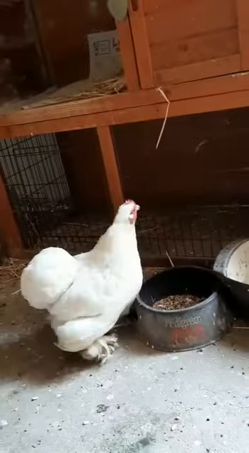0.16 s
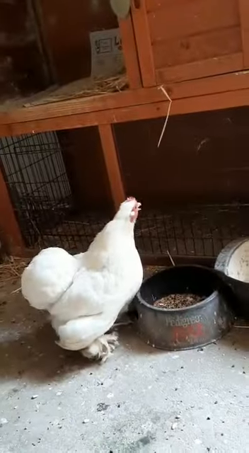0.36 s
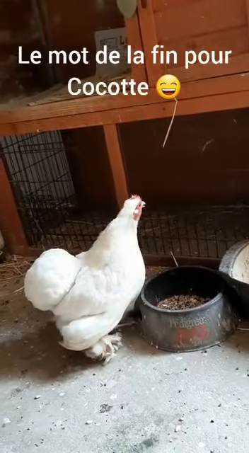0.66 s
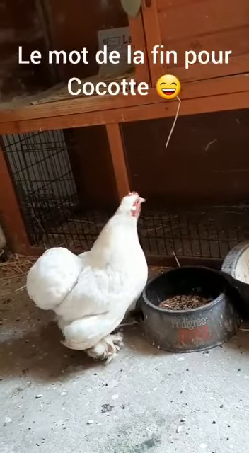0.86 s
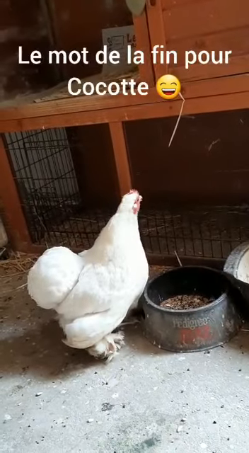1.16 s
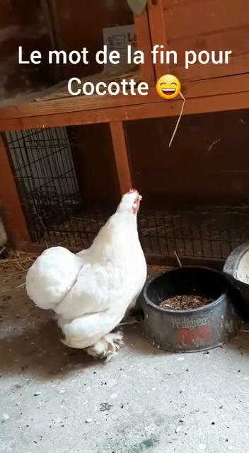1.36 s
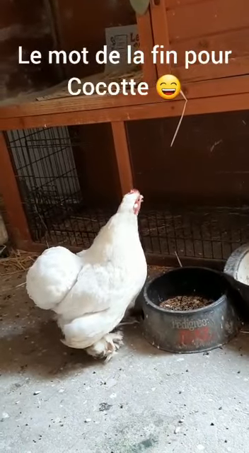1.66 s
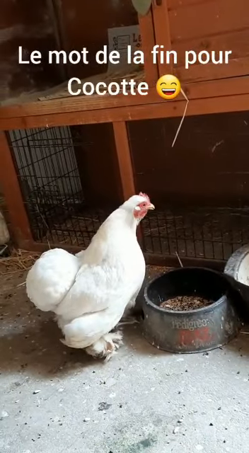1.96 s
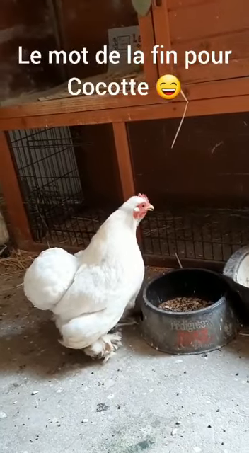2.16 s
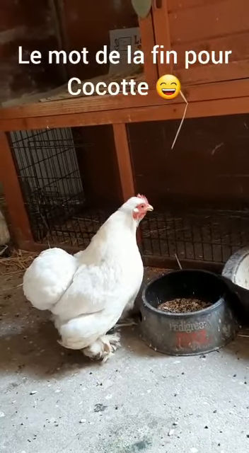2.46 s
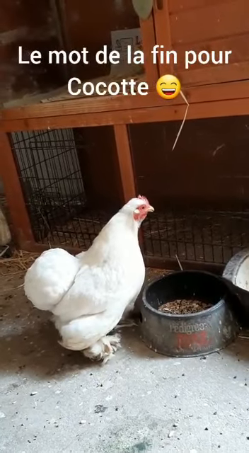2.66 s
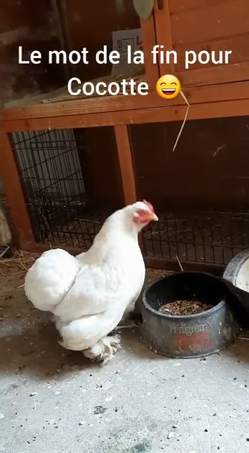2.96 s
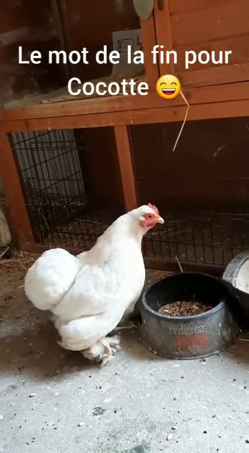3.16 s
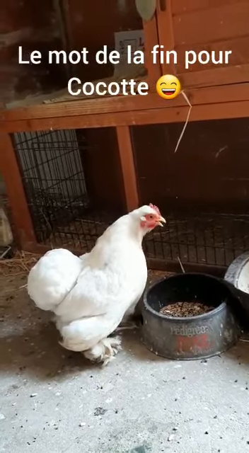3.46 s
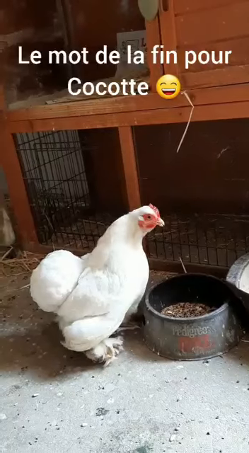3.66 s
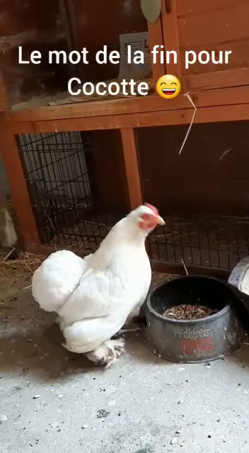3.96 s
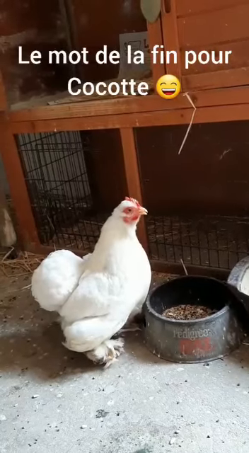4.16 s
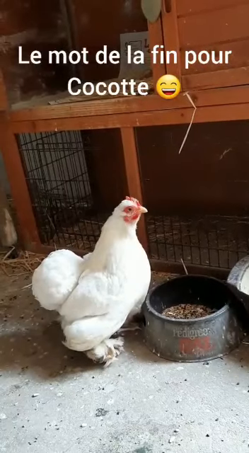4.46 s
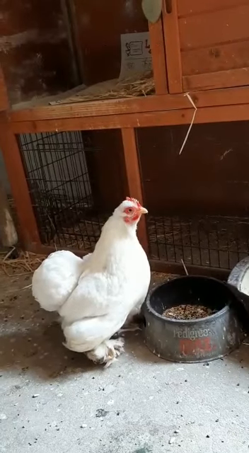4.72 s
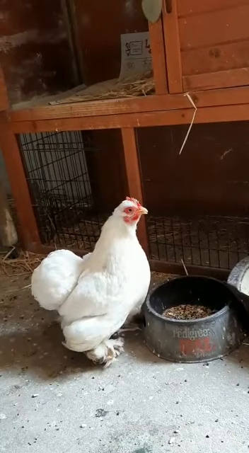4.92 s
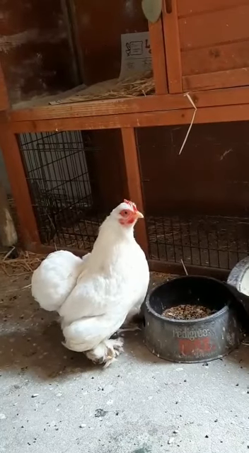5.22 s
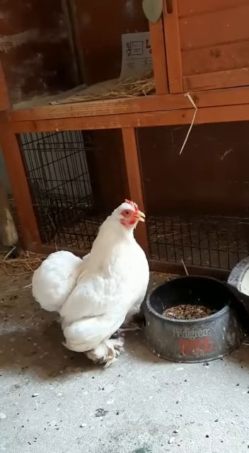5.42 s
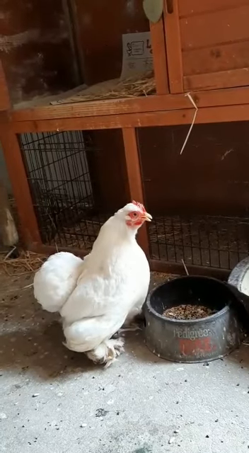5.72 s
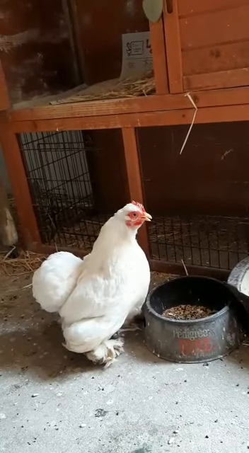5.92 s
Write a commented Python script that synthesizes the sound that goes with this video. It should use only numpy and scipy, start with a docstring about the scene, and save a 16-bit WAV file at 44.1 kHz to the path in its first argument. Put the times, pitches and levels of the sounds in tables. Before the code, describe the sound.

Close, echoing hen cackle: croaky little clucks spaced unevenly, four sudden piercing squawks, a few thin squeaks and one soft bump.

```python
"""In a hard-floored shed, beside a wooden coop, a hen cackles: short low clucks, and four times a cluck
that breaks upward into a loud, bright squawk. A few thin squeaks slip in, and there is one soft bump.
Clucks and squawks are pulse trains with turbulence, filtered by throat resonances; squeaks are sums
of a few sines; the bump is a decaying noise thud with a tick. The shed rings after each of them,
over a faint background of still air."""
import sys
import numpy as np
from scipy import signal
from scipy.fft import rfft, irfft, next_fast_len
from scipy.io import wavfile
from scipy.ndimage import uniform_filter1d, map_coordinates

SR = 44100
rng = np.random.default_rng(int(sys.argv[2]) if len(sys.argv) > 2 else 0)


def output_pcm(signal):
    """Save a mono or channel-first signal as 16-bit PCM at the path in sys.argv[1].

    Samples are clipped to [-1, 1] before scaling.
    """
    pcm = np.clip(np.atleast_2d(signal).T, -1, 1) * 32767
    wavfile.write(sys.argv[1], SR, np.round(pcm).astype(np.int16))


N = 268402

# All call levels hold at the source, before the shed.
# Squawks: (time [s], length [s], climb time [s], pitch on arrival [Hz], held pitch [Hz],
# pitch of the last push [Hz], clear-voice body level at the start [dB], the same at the end [dB],
# clear-voice treble level [dB])
SQUAWK_CALLS = [ (.312, 0.21, 0.063, 715, 703.3, 722, -26, -24.5, -28.5),
                (1.68, 0.24, .056, 692.1, 701.8, 730.7, -22.5, -25.5, -28.5),
                (3.411, .243, .058, 713.2, 696.7, 748, -21.5, -24.5, -27.5),
                (5.401, 0.23, .072, 752, 724, 743.2, -18, -25.5, -28), ]
# Clucks, the first just over as the scene opens: (time [s], length [s], climb time [s],
# top pitch before sag and wander [Hz], start level before the pressure deficit [dB], end level [dB],
# treble re body once the pressure is up [dB])
CLUCK_CALLS = [ (-.11, 0.078, .04, 426.4, -26, -44.5, -12.5),
               (0.236, 0.075, 0.033, 452.8, -36.5, -29.5, -11.5),
               (0.847, .059, .022, 476.5, -31.5, -32, -13), (1.205, 0.099, 0.088, 465.2, -36, -31, -12),
               (1.588, 0.084, 0.06, 449, -36, -29.5, -9.5), (2.262, 0.075, .018, 437.8, -30, -37, -12.5),
               (2.632, 0.098, 0.088, 428.2, -33, -34.5, -10), (2.931, 0.091, 0.026, 412.5, -31, -37, -13),
               (3.338, 0.068, 0.041, 453.8, -33.5, -27, -10.5), (4, 0.056, 0.038, 449.7, -35, -32.5, -10.5),
               (4.349, 0.062, 0.0208, 278.1, -30.5, -40, -10),
               (4.674, .052, 0.0174, 298.6, -32, -34, -11.5),
               (5.082, 0.058, 0.017, 305.9, -28.5, -33.5, -10.5), (5.337, .065, 0.048, 435.3, -27, -28, -7),
               (5.949, 0.08, .044, 452, -29, -33, -8), ]
# Squeaks: (time [s], length [s], start pitch [Hz], end pitch [Hz], mid-call level [dB], roughness [0-1])
SQUEAK_CALLS = [ (2.203, .05, 1690, 1530, -56.5, 0.15), (2.561, .062, 1577, 1590, -50, 0.06),
                (5.743, 0.11, 1714, 1861, -41.5, 0.27), ]
# Throat resonances, beak wide open: (centre [Hz], width [Hz], level [dB])
OPEN_THROAT = [(596, 210, -15.5), (1153, 275, 11.5), (1491, 250, 2.5), (2104, 300, 3), (2825, 75, -22),
               (3568, 400, -1.5), (4262, 300, -7.5), (5120, 350, -14.5), (5730, 500, -3), (7180, 2100, -16),
               (9680, 680, -16), (12400, 4600, -21), (12300, 4600, -12.5)]
# Throat resonances, beak nearly shut: (centre [Hz], width [Hz], level [dB])
SHUT_THROAT = [(306, 120, -7.5), (464, 150, -19.5), (846, 230, -6.5), (1055, 163, 3), (1500, 153, -1.5),
               (1840, 340, -16), (3617, 920, -13.5), (4934, 510, -17.5), (5720, 2100, -25), (7700, 94, -27),
               (9500, 240, -27.5), (11400, 730, -20), (13700, 2300, -23), (15400, 3800, -36)]
# Throat resonances of the lowest, most closed notes: (centre [Hz], width [Hz], level [dB])
LOW_THROAT = [(312, 130, -2.5), (831, 130, -13), (1092, 348, 9), (1515, 190, 4), (3430, 450, -15),
              (4844, 270, -12), (5870, 860, -27), (7930, 200, -23), (11000, 780, -29.5), (11400, 1100, -32),
              (13100, 3600, -30.5), (15100, 1600, -19.5)]
# Antiresonances of the windpipe: (centre [Hz], width [Hz], depth [dB])
WINDPIPE_NOTCHES = [(2585, 228, -8), (6230, 180, -14), (7430, 320, -2.5)]
# Bumps, before the shed: (time [s], level [dB])
BUMPS = [(4.327, -40)]
# Spectrum of the thud: (frequency [Hz], relative level [dB])
THUD_COLOUR = [(25, -19.5), (90, -8), (190, 2.0), (400, -12.5), (850, -2.5), (2000, -24), (8000, -30)]
# Reverberation time of the shed: (frequency [Hz], t60 [s])
SHED_T60 = [(100, 0.56), (290, 0.41), (530, 0.52), (1400, 0.45), (3700, 0.43), (9700, 0.28), (16000, 0.25)]
# Spectrum of the ringing as it starts: (frequency [Hz], relative level [dB])
TAIL_COLOUR = [(100, 14), (300, -3), (600, 3), (1000, -2), (2200, 2.5), (4000, 1), (8000, 5), (16000, -4.5)]
# Spectral density of the still air: (frequency [Hz], relative level per Hz [dB])
AIR_COLOUR = [(25, -4.5), (90, -10.5), (300, -8), (1000, -6.5), (2500, -17), (5000, -20), (15000, -22)]
# Sensitivity of the left port over the right: (frequency [Hz], level difference [dB])
PORT_DIFFERENCE = [(200, 0), (900, -0.1), (2500, 1), (6000, -1), (7800, 3), (9000, -9), (11000, -7),
                   (15000, -7)]

LEAD = SR // 4  # samples of sound before time zero
TOP_HZ, EDGE_HZ = 15900, 300  # band limit and the width of its slope
PORT_SPACING = 0.00051  # s of sound travel between the two ports
SWELL = .02  # s over which a call builds before its start

SQUAWK_START_HZ, SQUAWK_END_HZ = 553.8, 501.8  # where the voice enters and leaves the high register
HOLD_SHARE = .67  # part of a squawk that passes before the last push
COLLAPSE_S = 0.025  # the pitch falls away at the very end
CLEAN_HZ, BREAK_HZ = 680, 130  # clear from this pitch up, fully hoarse this far below it
HOARSE_BODY_DB, HOARSE_TREBLE_DB = 2, -6.5  # a hoarse voice is fuller and duller than a clear one

CLUCK_START_HZ = 271.8  # low croak at the start of each climb, before wander
CLUCK_SAG_HZ_PER_S = 500  # the pitch sinks once the climb is over
CLUCK_WANDER = .035  # scale of the random pitch wander, relative to the pitch
CLUCK_RISE_DB, CLUCK_RISE_S = 4, 0.02  # the pressure builds by this much at the start of a cluck
CLUCK_DULL_START_DB = 1.5  # the treble lags behind the body while the pressure builds
SQUEAK_EDGE_DB = -2.5  # a squeak is softer at both ends than in its middle


def squawk(length, climb_s, arrival_hz, held_hz, push_hz, start_db, end_db, top_db):
    """Register break: a clear scream, hoarse where the pitch enters and leaves the high register."""
    t, gate = airflow(length, attack=.004, release=.006)
    pitch_hz = squawk_pitch(t, length, climb_s, arrival_hz, held_hz, push_hz)
    hoarse = np.clip((CLEAN_HZ - pitch_hz) / BREAK_HZ, 0, 1)
    db = np.interp(t, [0, length], [start_db, end_db]) + HOARSE_BODY_DB * hoarse
    treble_db = top_db + HOARSE_TREBLE_DB * hoarse - db  # re body
    pulses, puffs = syrinx(t, pitch_hz, jitter=.003 + .03 * hoarse, jitter_rate=220)

    # a slower second vibration puts side bands between the harmonics
    second_hz = 290 * (1 + 0.056 * wobble(t, 90))
    second = np.sin(2 * np.pi * np.cumsum(second_hz) / SR)
    pulses = pulses * (1 + (.03 + .5 * hoarse) * second)

    body_rough = .03 + .6 * hoarse
    treble_rough = .06 + .75 * hoarse
    wide = voiced(pulses, puffs, OPEN_THROAT, 4650, treble_db, body_rough, treble_rough)
    narrow = voiced(pulses, puffs, SHUT_THROAT, 4350, treble_db, body_rough, treble_rough)
    shut = 0.32 * hoarse ** 2  # the beak opens as the pitch climbs
    return gate * amp(db) * ((1 - shut) * wide + shut * narrow)


def squawk_pitch(t, length, climb_s, arrival_hz, held_hz, push_hz):
    """Pitch follows tension: it climbs, settles, lifts with a last push and collapses."""
    top_hz = np.interp(t, [climb_s, HOLD_SHARE * length, length - COLLAPSE_S, length],
                       [arrival_hz, held_hz, push_hz, SQUAWK_END_HZ])
    return SQUAWK_START_HZ + (top_hz - SQUAWK_START_HZ) * climb(t, climb_s)


def cluck(length, climb_s, top_hz, start_db, end_db, treble_db):
    """Irregular vibration: a croaky note climbs and sags while the throat opens a little with pitch."""
    t, gate = airflow(length, attack=.0015, release=.006)
    pitch_hz = CLUCK_START_HZ + (top_hz - CLUCK_START_HZ) * climb(t, climb_s)
    pitch_hz = pitch_hz - CLUCK_SAG_HZ_PER_S * np.maximum(np.minimum(t, length) - climb_s, 0)
    pitch_hz = pitch_hz * (1 + CLUCK_WANDER * wobble(t, 110.2))

    slack = 1 - climb(t, CLUCK_RISE_S)  # pressure still missing, 1 to 0
    db = np.interp(t, [0, length], [start_db, end_db]) - CLUCK_RISE_DB * slack
    treble_db = treble_db - CLUCK_DULL_START_DB * slack

    pulses, puffs = syrinx(t, pitch_hz, jitter=.022, jitter_rate=300)
    shimmer_db = 1.8 * wobble(t, 250)  # the strength of the pulses varies at random
    pulses = pulses * amp(shimmer_db)
    low = voiced(pulses, puffs, LOW_THROAT, 4030, treble_db, body_rough=.3, treble_rough=.6)
    high = voiced(pulses, puffs, SHUT_THROAT, 4350, treble_db, body_rough=.45, treble_rough=.8)
    opening = np.clip((pitch_hz - 315) / 70, 0, 1)
    return gate * amp(db) * ((1 - opening) * low + opening * high)


def squeak(length, start_hz, end_hz, middle_db, rough):
    """Few harmonics sound thin: a wavering whistle glides, swells and fades."""
    t, gate = airflow(length, attack=.004, release=.009)
    pitch_hz = np.interp(t, [0, length], [start_hz, end_hz])
    pitch_hz = pitch_hz * (1 + (0.023 + 0.062 * rough) * wobble(t, 700))
    db = middle_db + SQUEAK_EDGE_DB * np.interp(t, [0, length / 2, length], [1, 0, 1])
    phase = 2 * np.pi * np.cumsum(pitch_hz) / SR
    harmonics_db = (0, -4, -14, -26)  # relative to the fundamental
    whistle = sum(amp(level) * np.sin(k * phase) for k, level in enumerate(harmonics_db, 1))
    return gate * amp(db) * unit(whistle)


def syrinx(t, pitch_hz, jitter, jitter_rate, smear=0.046):
    """Membrane oscillation: one slightly spread pulse a cycle, each with a puff of turbulence."""
    phase = 2 * np.pi * np.cumsum(pitch_hz * (1 + jitter * wobble(t, jitter_rate))) / SR
    k = np.arange(1, int(TOP_HZ / pitch_hz.min()) + 2)[:, None]  # harmonic numbers
    below_nyquist = k * pitch_hz < SR / 2
    pulses = np.sum(np.cos(k * phase - smear * k ** 2) * below_nyquist, axis=0)
    puffs = rng.standard_normal(SR)[:len(t)] * (1 + np.cos(phase))
    return unit(pulses), unit(puffs)


def voiced(pulses, puffs, modes, notch_hz, treble_db, body_rough, treble_rough):
    """Source and filter: the throat shapes body and noisier treble; treble_db sets treble re body."""
    low = lambda hz: 1 / (1 + (hz / 2600) ** 16)
    body = filtered(pulses + body_rough * puffs, lambda hz: throat(modes, notch_hz, hz) * low(hz))
    treble = filtered(pulses + treble_rough * puffs,
                      lambda hz: throat(modes, notch_hz, hz) * (1 - low(hz)))
    return steady(body) + amp(treble_db) * steady(treble)


def throat(modes, notch_hz, hz, floor_db=-40):
    """Resonance and antiresonance: a causal response whose notch at notch_hz goes with the beak."""
    gain = sum(amp(db) / (1 + (2 * (hz - centre) / width) ** 2) for centre, width, db in modes)
    notches = list(WINDPIPE_NOTCHES) + [(notch_hz, 200, -15)]
    notch_db = sum(db * np.exp(-((hz - centre) / width) ** 2) for centre, width, db in notches)
    gain = gain * amp(notch_db)
    # a low floor around 100 Hz keeps the response from falling to nothing just below the voice
    floor = amp(floor_db) * (hz / 100) ** 2 / (1 + (hz / 100) ** 4)
    gain = gain * hz ** 4 / (hz ** 4 + 210 ** 4) + floor
    # folding the cepstrum forward in time gives the minimum-phase response
    cepstrum = irfft(np.log(gain + 1e-5))
    cepstrum[len(cepstrum) // 2:] = 0
    cepstrum[1:] *= 2
    return np.exp(rfft(cepstrum))


def airflow(length, attack, release):
    """Self-excitation: vibration grows exponentially, saturates, and dies when the air stops."""
    t = np.arange(int(length * SR) + SR // 16) / SR - SWELL  # s from the start of the call
    onset = 1 / (1 + np.exp(1 - t / attack))
    decay = np.exp(-np.maximum(t - length, 0) / release)
    return t, onset * decay


def climb(t, duration):
    """Membrane tension: a smooth step from 0 to 1 as the membranes tighten."""
    return np.sin(np.pi / 2 * np.clip(t / duration, 0, 1)) ** 2


def bump(thud_db=-6, tick_db=-11, t60=0.16):
    """Damped impact: a decaying low noise thud with a brief tick at its start."""
    t = np.arange(SR // 2) / SR
    thud = unit(filtered(rng.standard_normal(len(t)), lambda hz: amp(along(THUD_COLOUR, hz))))
    tick = amp(-60 * t / .008) * rng.standard_normal(len(t))
    return amp(thud_db - 60 * t / t60) * thud + amp(tick_db) * tick


def shed(x, direct_db=-6.5, early_db=-4, early_t60=0.051, tail_db=-4, build=0.0062):
    """Reverberation at two ports: direct sound, floor and coop reflections, then the shed's ringing."""
    hz, frame_s, noise = signal.stft(rng.standard_normal((2, SR)), SR, nperseg=256)
    decay_db = along(TAIL_COLOUR, hz)[:, None] - 60 * frame_s / along(SHED_T60, hz)[:, None]
    tail = signal.istft(noise * amp(decay_db), SR, nperseg=256)[1][:, :SR]
    t = np.arange(SR) / SR
    tail = tail * (1 - np.exp(-t / build))

    sparse = (rng.random(SR) < .02) * (t > .001)
    early = rng.standard_normal((2, SR)) * sparse * amp(-60 * t / early_t60)
    echoes = (amp(early_db) * unit(early) + amp(tail_db) * unit(tail)) / np.sqrt(SR)

    def mid_side(hz):
        # long waves reach both ports alike, short ones differ
        coherence = np.clip(0.84 * np.sinc(2 * hz * PORT_SPACING), -1, 1)
        return np.sqrt((1 + np.outer([1, -1], coherence)) / 2)

    mid, side = filtered(echoes, mid_side)
    answer = np.array([mid + side, mid - side])
    answer[:, 0] += amp(direct_db)
    return signal.fftconvolve(x[None], answer, axes=1)


def air(level_db=-80):
    """Partly coherent noise: faint still air, mostly alike at both ports."""
    noise = rng.standard_normal(N) + 0.24 * rng.standard_normal((2, N))
    return amp(level_db) * unit(filtered(noise, lambda hz: amp(along(AIR_COLOUR, hz))))


def amp(db):
    """Logarithmic level: decibels to amplitude gain."""
    return 10 ** (np.asarray(db) / 20)


def unit(x):
    """Normalisation: scale to rms 1."""
    return x / np.sqrt(np.mean(x ** 2) + 1e-20)


def steady(x):
    """Level equalisation: hold the short-time rms near 1."""
    power = np.abs(uniform_filter1d(x ** 2, size=600))
    return x / np.sqrt(power + 1e-3 * np.mean(x ** 2))


def along(points, hz):
    """Interpolation: (frequency [Hz], value) points read on a log frequency axis."""
    f, v = np.transpose(points)
    return np.interp(np.log(hz + 1), np.log(f), v)


def wobble(t, rate):
    """Slow random modulation: a smooth curve over the times t, rate knots a second."""
    at = (t - t[0]) * rate
    return map_coordinates(rng.standard_normal(4096), [at], mode="wrap")


def filtered(x, response):
    """Linear filtering: the spectrum of x times a response of frequency."""
    n = x.shape[-1]
    m = 2 * next_fast_len(n // 2 + 4096)
    return irfft(rfft(x, m) * response(np.fft.rfftfreq(m, 1 / SR)), m)[..., :n]


def add(track, s, sound):
    """Superposition: mix a stereo sound into the track from time s on."""
    rest = track[:, LEAD + round(s * SR):][:, :sound.shape[1]]
    rest += sound[:, :rest.shape[1]]


def scene():
    """Superposition: each call draws new echoes, as for a hen that moves her head between calls."""
    track = np.zeros((2, LEAD + N))
    for call, table in ((squawk, SQUAWK_CALLS), (cluck, CLUCK_CALLS), (squeak, SQUEAK_CALLS)):
        for s, *shape in table:
            add(track, s - SWELL, shed(call(*shape)))
    for s, db in BUMPS:
        add(track, s, shed(amp(db) * bump()))
    return track[:, LEAD:] + air()


def record(dry):
    """Port response: the ports differ in the treble, deep bass rolls off, the top is band-limited."""
    def response(hz):
        ports = amp(np.outer([.5, -.5], along(PORT_DIFFERENCE, hz)))
        bass_cut = hz / np.hypot(hz, 45)
        band_limit = np.clip((TOP_HZ - hz) / EDGE_HZ + .5, 0, 1)
        return ports * bass_cut * band_limit

    return filtered(dry, response)


dry = scene()
out = record(dry)
output_pcm(out)
```